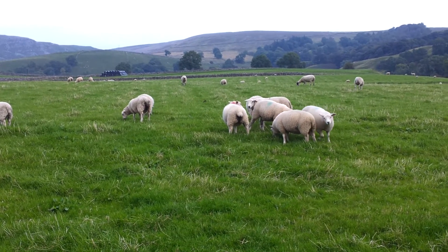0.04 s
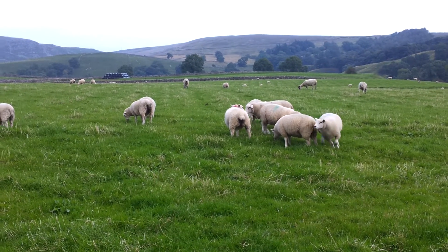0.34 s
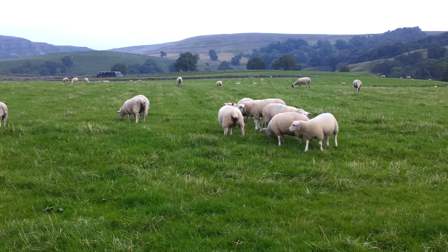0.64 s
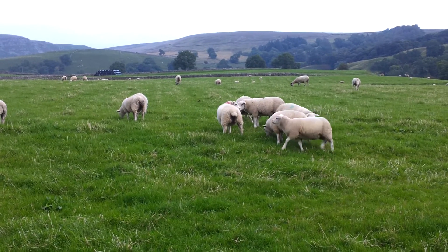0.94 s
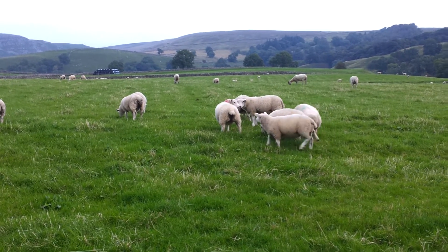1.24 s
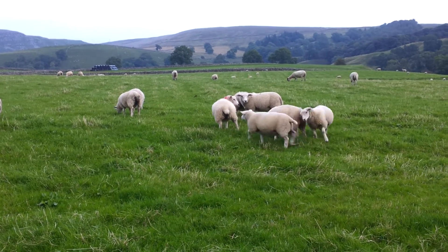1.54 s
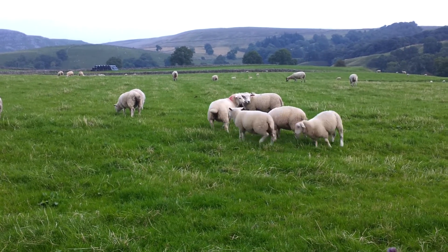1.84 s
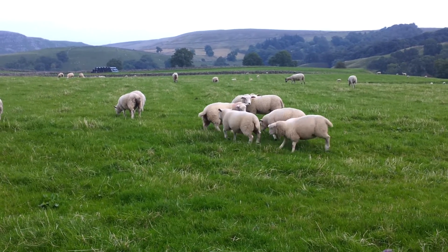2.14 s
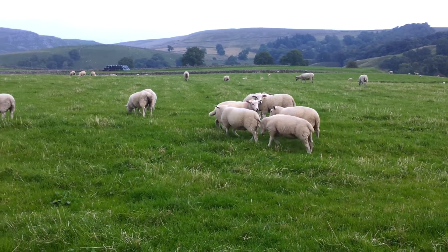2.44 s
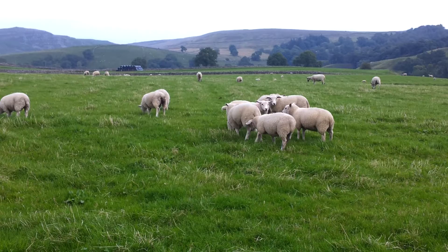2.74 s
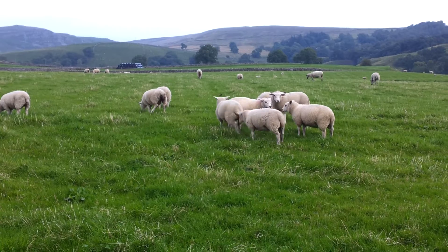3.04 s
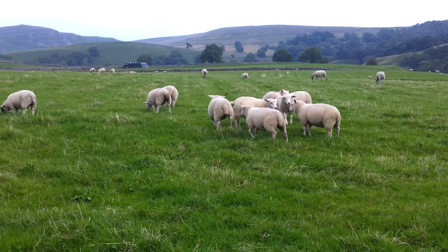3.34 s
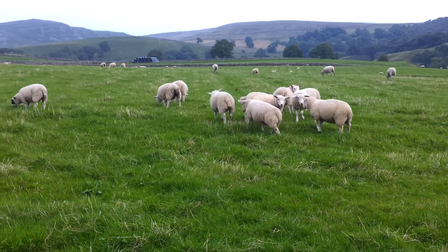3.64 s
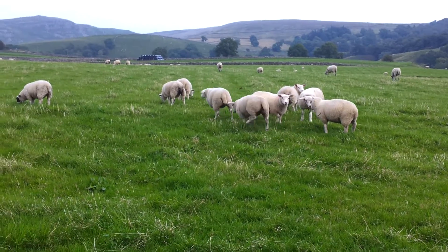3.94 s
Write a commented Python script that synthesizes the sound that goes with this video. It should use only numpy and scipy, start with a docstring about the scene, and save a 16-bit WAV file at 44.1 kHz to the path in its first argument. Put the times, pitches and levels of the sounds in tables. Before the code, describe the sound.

A sheep gives one quiet, stuttering bleat, with rustling grass and wind buffeting the microphone.

```python
"""Sheep in a windy pasture

A sheep gives one quiet, stuttering bleat, its vocal folds ringing throat and mouth in short bursts,
while the flock brushes through the grass and snaps dry stalks. Wind picks up and buffets the two
microphone ports in turn, with one hard gust near the end. Behind it are a steady hiss, a soft low
drone and the thin call of a far-off animal."""
import sys
import numpy as np
from scipy import signal
from scipy.fft import rfft, irfft
from scipy.io import wavfile
from scipy.ndimage import uniform_filter1d, map_coordinates

SR = 44100
rng = np.random.default_rng(int(sys.argv[2]) if len(sys.argv) > 2 else 0)


def dump_mix(stems):
    """Bounce the given channels to the path in sys.argv[1] as a 16-bit WAV at rate SR."""
    frames = np.atleast_2d(stems).T  # one column per channel
    limited = np.clip(frames, -1, 1)  # hard clip at full scale
    pcm = np.round(limited * 32767).astype(np.int16)
    wavfile.write(sys.argv[1], SR, pcm)


N = 176400
T = np.arange(N) / SR

# The stutters of the bleat: (start [s], length [s], pitch [Hz], level [dB], resonance tuning [ratio],
# upward glide [fraction], mouth centre [Hz], mouth level [dB], roughness [0-1])
BLEAT_BURSTS = [(0.993, .030, 179, -43.5, 1.055, .12, 4160, -12, .6),
                (1.083, 0.028, 95.6, -42, 1.0, 0.0075, 4100, -1.5, 0.33),
                (1.1490, 0.033, 204.6, -37, 0.983, .02, 4250, -2.5, 0.33),
                (1.2210, 0.034, 200.6, -38, 0.98, 0.031, 4460, -4, 0.33),
                (1.3008, .038, 196.8, -41, .995, -0.0076, 4500, -1.5, 0.3),
                (1.374, .040, 197, -40.5, 0.99, 0, 4570, -6.5, 0.37),
                (1.444, 0.041, 188, -42.5, 0.98, -0.021, 4680, -11, 0.4)]
def sheep():
    """The bleat sits left; the ground smears its treble and the field adds a faint tail."""
    right_db, ground_decay_s, field_t60_s = -7, 0.0024, 0.22
    voice = np.zeros(N)
    for start, *settings in BLEAT_BURSTS:
        add(voice, start, bleat_burst(*settings))
    treble = np.diff(voice, prepend=0)
    ground = amp(-14) * scatter(treble, ground_decay_s)
    field = amp(-12) * scatter(voice, field_t60_s / np.log(1000))
    return (voice + ground) * amp([[0], [right_db]]) + field


# Throat formants, plus the microphone's bright ring near 7 kHz, before each burst's tuning:
# (centre [Hz], width [Hz], gain [dB])
BLEAT_RESONANCES = [(220, 260, -11), (1010, 160, -13), (1240, 210, -2), (1400, 210, 0), (2460, 300, -18),
                    (2900, 400, -21), (3460, 220, -14), (6650, 500, -2.5), (7300, 700, -13)]
def bleat_burst(length, pitch_hz, level_db, tuning, glide, mouth_hz, mouth_db, roughness):
    """A few snaps of the vocal folds, each with a puff of air, ring throat, mouth and microphone."""
    attack_s, release_s, sag_db, jitter = 0.0027, 0.0038, -6.5, 0.021
    mouth_split_hz, mouth_width_hz = 267, 360
    t = T[:SR // 10]
    cycles = np.cumsum(pitch_hz * (1 + jitter * drift(pitch_hz)[:len(t)])) / SR
    folds = np.diff(np.floor(cycles), prepend=-1)
    puffs = np.exp(-(cycles % 1)) * rng.standard_normal(len(t))
    attack = 1 - np.exp(-t / attack_s) / 2
    release = np.clip((length - t) / release_s, 0, 1)
    envelope = attack * release * amp(sag_db * t / length)
    drive = envelope * (unit(folds - folds.mean()) + roughness * unit(puffs))
    tuned = [(hz * tuning, width, db) for hz, width, db in BLEAT_RESONANCES]
    mouth = [(mouth_hz + side * mouth_split_hz, mouth_width_hz, mouth_db) for side in (-1, 1)]
    voice = sum((-1) ** k * amp(db) * resonate(drive, hz, width)
                for k, (hz, width, db) in enumerate(tuned + mouth))
    speed = 1 + glide * (np.minimum(t / length, 1) - .5)  # bends pitch and resonances together
    voice = map_coordinates(voice, [np.cumsum(speed)], order=3)
    return amp(level_db) * unit(voice) * np.sqrt(length * SR / len(t))


# Hoof steps and swishes: (peak time [s], level [dB], attack [s], decay [s])
HOOF_STEPS = [(.26, -51, .02, .03), (.46, -49.5, 0.017, .025), (.56, -49, 0.022, 0.011),
              (.76, -47, 0.014, 0.046), (.95, -49.5, 0.045, .04), (1.0, -47, .015, 0.034),
              (1.05, -46.5, .01, 0.12), (1.26, -48.5, 0.24, 0.044), (1.53, -50, 0.14, 0.053),
              (1.6, -47.5, .015, 0.017), (1.685, -41, 0.02, 0.019), (1.85, -49.5, 0.11, 0.17),
              (2.02, -43.5, 0.029, 0.078), (2.2, -51, 0.043, 0.085), (2.313, -41, 0.048, 0.044),
              (2.505, -41, 0.043, 0.046), (2.639, -40, 0.0065, 0.041), (2.75, -43.5, 0.047, 0.053),
              (2.87, -45.5, .03, .03), (3.07, -49, 0.044, 0.025), (3.24, -46, 0.085, 0.051),
              (3.36, -51, 0.099, .04), (3.47, -45.5, 0.058, 0.025), (3.595, -45.5, 0.043, 0.02),
              (3.675, -46, 0.072, 0.1), (3.92, -45, 0.045, 0.043)]
# EQ of the rustle: (frequency [Hz], gain [dB])
GRASS_EQ = [(200, -60), (1500, -12), (2900, -16.5), (4200, -8), (4900, -7.5), (5800, -10.5), (6600, -0.5),
            (7400, 1.5), (8000, -2), (8700, -10), (10200, -10.5), (12000, -15.5), (14500, -14)]
GRASS_RIGHT_DB = -3.5
def grass():
    """Each step brushes a swarm of blades that tick and hiss over a bed of grazing."""
    grazing_db, blades_per_s, spread_db = -54, 7000, 3
    power = amp(grazing_db) ** 2 * np.minimum(T, 1)
    for time, db, attack, decay in HOOF_STEPS:
        power += (amp(db) * np.exp(-np.maximum((time - T) / attack, (T - time) / decay))) ** 2
    blades = rng.standard_normal((3, N)) * (rng.random((3, N)) < blades_per_s / SR)
    blades *= amp(spread_db * np.minimum(rng.exponential(1, (3, N)), 4))
    ticks = blades[:2] + 0.4 * blades[2]  # left and right, plus a shared centre
    eq = amp(read(GRASS_EQ, np.fft.rfftfreq(N, 1 / SR)))
    swish = unit(irfft(rfft(ticks) * eq, N))
    return swish * np.sqrt(power) * amp([[0], [GRASS_RIGHT_DB]])


# Stalks breaking: (time [s], peak [dB], brightness [dB], decay [s], pitch [Hz])
STALK_SNAPS = [(.1612, -25.5, -1, .0012, 7240), (.2087, -32, -23, 0.00057, 6960),
               (1.9303, -27.5, -20, 0.0015, 7440), (2.638, -31.5, -26, 0.0032, 4430),
               (2.638, -33, -26, .004, 7500), (3.228, -46, -14, .001, 7360)]
def stalks():
    """Dry stalks break with a tiny bright tick."""
    out, t = np.zeros((2, N)), T[:SR // 30]
    for time, db, bright_db, decay_s, hz in STALK_SNAPS:
        for channel, side_db in zip(out, (0, GRASS_RIGHT_DB)):
            crack = np.diff(rng.standard_normal(len(t)), prepend=0) * np.exp(-t / decay_s)
            tick = resonate(crack, hz, width_hz=1300) + amp(bright_db) * crack / 2
            add(channel, time, amp(db + side_db) * tick / abs(tick).max())
    return out


# Wind pressure on each port: (time [s], level [dB])
GUSTS_LEFT = [(0, -53), (.25, -49.5), (.35, -41.5), (.6, -46.5), (1.42, -47.5), (1.58, -37), (1.66, -41),
              (1.8, -42.5), (2.2, -39.5), (2.6, -38), (2.8, -40), (3.0, -38.5), (3.26, -48), (3.37, -37.5),
              (3.48, -42), (3.57, -36), (3.615, -15.5), (3.68, -22), (3.715, -24.5), (3.76, -22.5),
              (3.81, -24), (3.85, -31), (4, -34.5)]
GUSTS_RIGHT = [(0, -68), (.35, -48), (1.0, -57), (1.59, -55), (1.628, -29), (1.69, -37.5), (1.74, -30.5),
               (1.82, -38.5), (1.99, -30.5), (2.15, -41), (2.25, -32), (2.36, -43), (2.58, -33),
               (2.73, -41), (2.9, -32.5), (3.06, -37), (3.14, -39), (3.49, -54), (3.57, -35.5),
               (3.85, -41.5), (3.93, -30.5), (4, -32.5)]
def wind():
    """Lumpy turbulence, unrelated at the two ports, opens up in tone as it blows harder."""
    eddy_hz, eddy_at_db, octaves_per_db, rolloff_order = 106, -38, 0.0635, 2.77
    low_cut_hz, high_cut_hz, lump_db = 22, 634, 3.13
    ports = (GUSTS_LEFT, GUSTS_RIGHT)
    hz, t, spectra = noise_frames(size=1024)
    hz = hz[:, None] + 1
    band_loss = (1 + (low_cut_hz / hz) ** 2) * (1 + (hz / high_cut_hz) ** 10)
    for port, gusts in enumerate(ports):
        corner_hz = eddy_hz * 2 ** (octaves_per_db * (curve(gusts, t) - eddy_at_db))
        tone = 1 / np.sqrt((1 + (hz / corner_hz) ** (2 * rolloff_order)) * band_loss)
        spectra[port] *= tone / np.sqrt((tone ** 2).mean(0))
    level_db = [curve(gusts, T) + lump_db * drift(rate_hz=25) for gusts in ports]
    return from_frames(spectra, size=1024) * amp(level_db)


# Single eddies thumping the ports: (time [s], level [dB], pitch [Hz], pan [0 left, 1 right])
EDDY_SLAPS = [(0.999, -27, 170, 0.4), (1.633, -24, 230, 1), (1.739, -17.5, 130, 0.97),
              (1.804, -17.5, 113, 0), (1.872, -23.5, 180, 0.9), (1.971, -18.5, 163, 0.9),
              (2.022, -24.5, 192, 0.8), (2.469, -22, 324, 0), (2.479, -18.5, 80.5, 0.23),
              (2.61, -25.5, 46, .5), (2.87, -23, 59, .8), (2.929, -23, 252, 1), (3.03, -25, 65, .4),
              (3.37, -27.5, 69.6, 0.2), (3.614, -7, 130, 0.1), (3.618, -19.5, 493, 0),
              (3.631, -15.5, 380, 0.04), (3.657, -13, 560, 0.01), (3.661, -13, 122, 0.04),
              (3.755, -11, 148, 0.23), (3.819, -14, 159, 0.08)]
def eddy_slaps():
    """A strong eddy gives one quick push and pull on a port."""
    width_cycles = 0.44
    out = np.zeros((2, N))
    for time, db, hz, pan in EDDY_SLAPS:
        cycles = (T - time) * hz
        thump = np.exp(-(cycles / width_cycles) ** 2 / 2) * np.sin(2 * np.pi * cycles)
        out -= np.outer([1 - pan, pan], amp(db) * thump)
    return out


# EQ of the open air: (frequency [Hz], gain [dB])
AIR_EQ = [(20, -15), (60, -8), (125, -2), (200, -9.5), (300, -10.5), (430, -15.5), (600, -16), (950, -16.5),
          (1800, -20.5), (3300, -22.5), (5800, -24.5), (7500, -25.5), (8500, -25), (12000, -26.5),
          (14300, -27)]
# Its stereo image, narrow lows and wide highs: (frequency [Hz], left-right correlation [0-1])
AIR_CORRELATION = [(40, 0.89), (300, 0.49), (700, 0.12), (3000, 0.05), (14000, 0.041)]
def air():
    """Steady hiss over the soft rumble of the valley."""
    left_db, right_db, shimmer_db = -49.5, -50.5, 1
    hz, _, spectra = noise_frames(size=1024)
    shared = read(AIR_CORRELATION, hz)[:, None]
    spectra[1] = shared * spectra[0] + np.sqrt(1 - shared ** 2) * spectra[1]
    shimmer = rng.standard_normal(spectra[0].shape)
    for axis in (0, 1):  # soft patches in frequency and time
        shimmer = uniform_filter1d(shimmer, size=14, axis=axis)
    spectra *= amp(read(AIR_EQ, hz)[:, None] + shimmer_db * unit(shimmer))
    return unit(from_frames(spectra, size=1024)) * amp([[left_db], [right_db]])


# Resonances of the drone: (centre [Hz], width [Hz], gain [dB])
DRONE_BANDS = [(207.5, 77, 0), (295.8, 46, -1.5), (410.7, 52, -6)]
# Its swell: (time [s], level [dB])
DRONE_SWELL = [(0, -61), (.55, -53), (.85, -47.5), (1.2, -49.5), (1.6, -56), (4, -55)]
def drone():
    """A fuzzy low drone swells early on, a little to the left."""
    noise = rng.standard_normal(N)
    hum = unit(sum(amp(db) * resonate(noise, hz, width) for hz, width, db in DRONE_BANDS))
    return hum * amp(curve(DRONE_SWELL, T)) * amp([[0], [-3]])


# Contour of the distant call: (time [s], pitch [Hz], level [dB])
CALL_CONTOUR = [(3.46, 862, -69), (3.53, 898, -66.5), (3.7, 882, -65), (3.85, 887, -62.5), (3.95, 872, -68)]
def far_animal():
    """A far-off animal holds one thin, slightly wavering note."""
    times, hz, db = np.transpose(CALL_CONTOUR)
    pitch_hz = np.interp(T, times, hz) * (1 + .006 * drift(rate_hz=29))
    envelope = np.interp(T, times, amp(db), left=0, right=0)
    return np.sqrt(2) * envelope * np.sin(2 * np.pi * np.cumsum(pitch_hz) / SR)


def amp(db):
    """Decibels to gain."""
    return 10 ** (np.asarray(db) / 20)


def unit(x):
    """Scales to rms 1."""
    return x / np.sqrt(np.mean(x ** 2) + 1e-20)


def curve(points, t):
    """Reads an automation curve at times t."""
    return np.interp(t, *np.transpose(points))


def read(points, hz):
    """Reads a table on a log-frequency axis."""
    f, value = np.transpose(points)
    return np.interp(np.log(hz + 1), np.log(f + 1), value)


def add(mix, start_s, sound):
    """Mixes a sound in at its cue."""
    part = mix[round(start_s * SR):][:len(sound)]
    part += sound[:len(part)]


def drift(rate_hz):
    """Smooth random modulation of rms 1."""
    lowpass = np.exp(-(np.fft.rfftfreq(N, 1 / SR) / rate_hz) ** 2)
    return unit(irfft(rfft(rng.standard_normal(N)) * lowpass, N))


def resonate(x, hz, width_hz):
    """A steep resonance of gain 1: one pole applied twice."""
    radius = np.exp(-np.pi * width_hz / SR)
    pole = radius * np.exp(2j * np.pi * hz / SR)
    return 2 * signal.lfilter([(1 - radius) ** 2], [1, -2 * pole, pole ** 2], x).real


def noise_frames(size):
    """Short-time spectra of two unrelated noises: Hz, s, channels x bins x frames."""
    return signal.stft(rng.standard_normal((2, N)), SR, nperseg=size, noverlap=size - size // 4)


def from_frames(spectra, size):
    """Short-time spectra back to sound."""
    return signal.istft(spectra, SR, nperseg=size, noverlap=size - size // 4)[1][:, :N]


def scatter(x, decay_s):
    """Diffuse reflections of energy 1, different at each port."""
    t = T[:SR // 2]
    tail = rng.standard_normal((2, len(t))) * np.exp(-t / decay_s)
    tail /= np.linalg.norm(tail, axis=1, keepdims=True)
    return signal.fftconvolve(x[None], tail, axes=1)[:, :N]


def scene():
    """The full pasture mix."""
    return sheep() + grass() + stalks() + wind() + eddy_slaps() + air() + drone() + far_animal()


def record(dry):
    """A steep high cut takes off the very top."""
    high_cut = signal.firwin(601, cutoff=14550, window=("kaiser", 9), fs=SR)
    return signal.oaconvolve(dry, high_cut[None], "same")


dry = scene()
out = record(dry)
dump_mix(out)
```